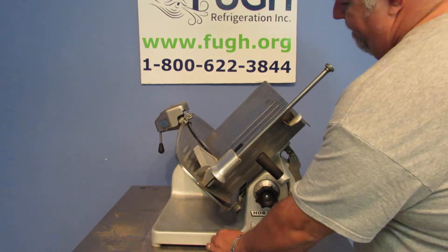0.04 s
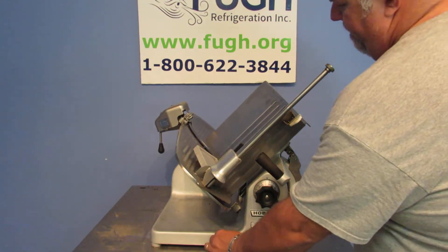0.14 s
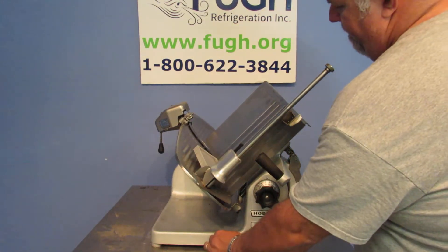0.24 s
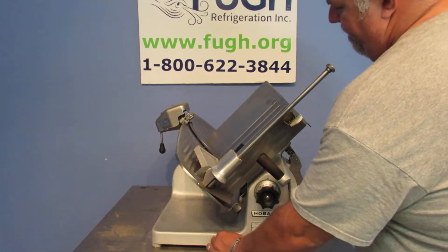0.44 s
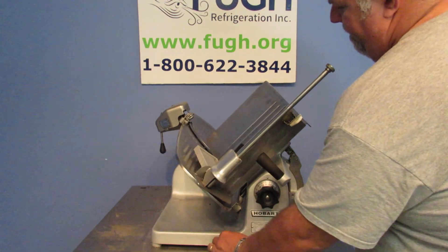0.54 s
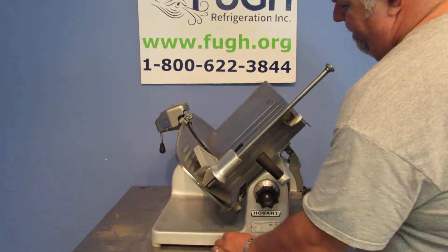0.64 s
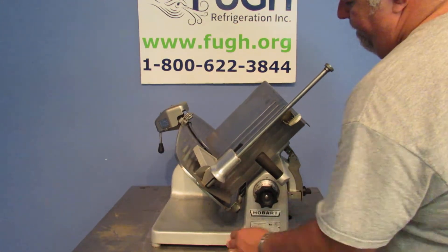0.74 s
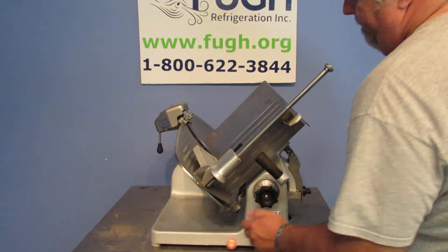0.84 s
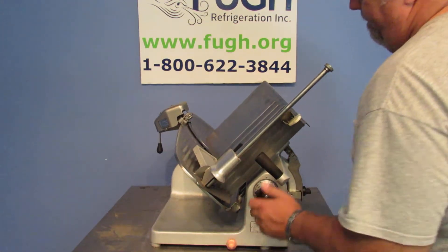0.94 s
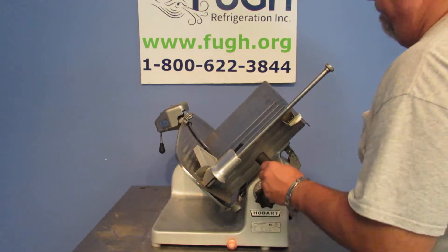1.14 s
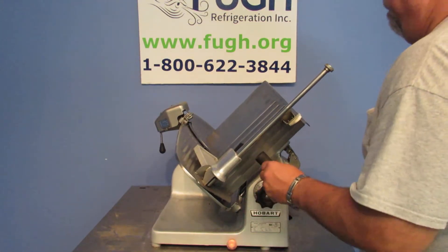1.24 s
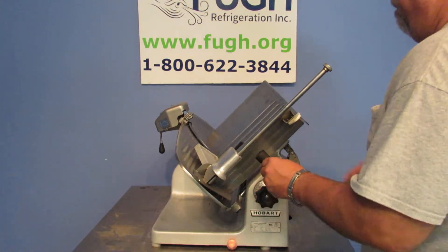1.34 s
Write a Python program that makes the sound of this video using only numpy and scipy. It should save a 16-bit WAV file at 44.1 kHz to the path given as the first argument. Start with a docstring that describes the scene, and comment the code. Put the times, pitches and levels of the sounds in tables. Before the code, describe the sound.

An electric meat slicer starts up close by in a small room. Its switch clacks twice, at about 0.1 and 0.2 seconds, and the motor kicks in with a deep throbbing buzz and metal rattle, loudest around 0.3 seconds. A softer click comes near 0.6 seconds. It then settles into a quieter, steady low hum with whirring gears and faint blade hiss until the end at about 1.4 seconds.

```python
"""A deli slicer on a steel table starts up in a small room, close to a stereo pair of microphones.
Its switch clacks twice; the motor jolts the gears and housing as it runs up, the starting switch
clicks out, and it settles into a mains hum with the whirr of the gears and the hiss of the blade.
Low room tone lies underneath, and the bass sits a little towards the right microphone."""
import sys
import numpy as np
from scipy import signal
from scipy.fft import rfft, irfft
from scipy.io import wavfile

SR = 44100
rng = np.random.default_rng(int(sys.argv[2]) if len(sys.argv) > 2 else 0)


def materialize(psi):
    """Save the field psi as 16-bit PCM at rate SR to the path in sys.argv[1].

    A 1-D psi becomes a single channel; in a 2-D psi each row is a channel.
    """
    bounded = np.clip(np.atleast_2d(psi).T, -1, 1)
    quanta = np.round(bounded * 32767).astype(np.int16)
    wavfile.write(sys.argv[1], SR, quanta)


N = 61739
T, HZ = np.arange(N) / SR, np.fft.rfftfreq(N, 1 / SR)
EARLY_HUM_HZ, MAINS_HUM_HZ, UP_TO_SPEED_S = 126.5, 120, .6


def amp(db):
    """Decibels to gain."""
    return 10 ** (np.asarray(db) / 20)


def unit(x):
    """Scales to rms 1."""
    return x / np.sqrt(np.mean(x ** 2) + 1e-20)


def read(points, hz):
    """Reads a table on a log-frequency axis."""
    f, value = np.transpose(points)
    return np.interp(np.log(hz + 1), np.log(f + 1), value)


def ramp(start_s, rise_s):
    """Rises from 0 to 1 and stays there."""
    return np.clip((T - start_s) / rise_s, 0, 1)


def drift(rate_hz):
    """Random wander of rms 1, mostly slower than rate_hz."""
    return unit(irfft(rfft(rng.standard_normal(N)) / (1 + (HZ / rate_hz) ** 4), N))


def mic_gains(hz):
    """Gains at the left and right microphones; the bass leans right."""
    # f/Hz, left minus right level/dB
    balance = [(30, -2), (120, -3.5), (330, -3), (700, -.4), (1400, .2), (12000, .2)]
    return amp(np.array([[.5], [-.5]]) * read(balance, hz))


def colour(pair, db):
    """Shapes two unrelated noises into one stereo sound of rms 1 with the given spectrum."""
    # likeness of the two channels: f/Hz, correlation
    likeness = [(30, .75), (120, .97), (300, .94), (700, .82), (1400, .84), (2200, .95), (3200, .95),
                (5500, .83), (9500, .52), (13000, .05)]
    a, b = rfft(pair)
    like = read(likeness, HZ)
    mid, side = a * np.sqrt(1 + like), b * np.sqrt(1 - like)
    return unit(irfft(np.array([mid + side, mid - side]) * amp(db) * mic_gains(HZ), N))


def room_tone():
    """The steady, low background noise of the room."""
    # spectrum: f/Hz, level/dB
    spectrum = [(15, -40), (30, -10), (60, -4), (120, -1), (180, -6), (280, 1), (380, -3), (520, -11),
                (700, -20), (1000, -14), (1400, -20.5), (2000, -24), (3200, -31.5), (7400, -32.5),
                (13300, -43.5), (14800, -51)]
    return amp(-41.5) * colour(rng.standard_normal((2, N)), read(spectrum, HZ))


def room_echo(x):
    """Diffuse tail off the walls of a small room, treble dying first."""
    # reverberation: f/Hz, t60/s
    decay = [(200, .35), (1500, .3), (5000, .25), (14000, .17)]
    hz, t, spectra = signal.stft(rng.standard_normal((2, N)), SR, nperseg=256)
    spectra *= amp(-60 * t / read(decay, hz)[:, None])
    tail = signal.istft(spectra, SR, nperseg=256)[1][:, :N]
    tail = colour(tail * ramp(.003, .004), 0) * (T < .5) / np.sqrt(N)
    return signal.fftconvolve(x, tail, axes=1)[:, :N]


def switches():
    """Each contact is a short crash of small metal parts, echoed by the room, with one brief ring."""
    # contacts: t/s, level/dB, tilt/(dB per octave), ring f/Hz, ring level/dB relative to the crash
    clicks = [(.1085, -28, -.3, 1980, -7), (.1165, -25.3, -.05, 1810, -6), (.1895, -30.5, -.8, 3200, -3.5),
              (.1955, -26, -.7, 1740, 1.5), (.567, -38, -.7, 2900, -6), (.576, -33.7, -.4, 4100, -6),
              (.686, -40, -5, 1050, -3)]
    # crash spectrum before the tilt: f/Hz, level/dB
    spectrum = [(100, -30), (600, -15), (1050, 4), (1350, -1), (1800, 2), (2600, -3), (4000, -2.5),
                (6500, -6), (9000, -5.5), (12000, -7.5), (15000, -16)]
    crash_t60_s, ring_t60_s = .06, .085
    crashes, rings = np.zeros((2, N)), np.zeros(N)
    for start, db, tilt_db, ring_hz, ring_db in clicks:
        age = np.maximum(T - start, 0)
        strike = amp(db) * ramp(start, rise_s=.0045)
        crash = colour(rng.standard_normal((2, N)), read(spectrum, HZ) + tilt_db * np.log2(HZ + 1))
        crashes += strike * amp(-60 * age / crash_t60_s) * crash
        ring = np.sin(2 * np.pi * ring_hz * age + .5 * drift(120))
        rings += strike * amp(ring_db - 60 * age / ring_t60_s) * ring
    return crashes + rings + amp(-6) * room_echo(crashes)


def motor_hum(cycles):
    """The motor's deep hum, throbbing and buzzier until it is up to speed."""
    # swell of the hum: t/s, relative level/dB
    swell = [(0.2, -50), (0.272, -22), (0.312, -16), (0.342, -18), (0.372, -31), (0.398, -23), (0.488, -29),
             (0.56, -25), (0.584, -27), (0.616, -39), (0.654, -26), (0.69, -26), (0.73, -36), (0.798, -29),
             (0.826, -33), (0.848, -30), (0.888, -37), (0.948, -32), (1.084, -36), (1.114, -33),
             (1.19, -38), (1.224, -31), (1.25, -34), (1.39, -33)]
    # overtones under starting load: harmonic number, level/dB relative to the hum
    overtones = [(2, -18), (3, -16), (4, -25)]
    throb_hz, throb_depth = 21, .3
    load = 1 - ramp(UP_TO_SPEED_S, .1)
    buzz = sum(amp(db) * (1 + .3 * drift(15)) * np.sin(2 * np.pi * (k * cycles + rng.random()))
               for k, db in overtones)
    throbbing = ramp(.36, .02) * (1 - ramp(.52, .04))
    throb = throb_depth * throbbing * np.cos(2 * np.pi * throb_hz * (T - .405))
    level = amp(np.interp(T, *np.transpose(swell)) - .3) * ramp(.19, .02) * (1 + throb)
    return np.sqrt(2) * level * (np.sin(2 * np.pi * cycles) + load * buzz) * mic_gains(MAINS_HUM_HZ)


def gear_rattle(cycles, spectrum, pulsing):
    """Grainy tooth contacts ring the housing; the share `pulsing` bunches on each cycle of the hum."""
    # housing resonances: f/Hz, width/Hz, boost/dB
    resonances = [(334, 25, 3.5), (377, 20, 3), (445, 20, 5), (910, 25, 6), (1020, 30, 2.5), (1135, 45, 4),
                  (1510, 36, 4.5), (1650, 25, 5), (1970, 50, 3.5), (3250, 50, 4)]
    pulse_cycles, grain_db = .3, 1.3
    bunching = 1 - pulsing + pulsing * unit(np.exp(-(cycles % 1) / pulse_cycles))
    contacts = rng.standard_normal((2, N)) * bunching * amp(grain_db * drift(300))
    housing_db = sum(db / (1 + (2 * (HZ - hz) / width) ** 2) for hz, width, db in resonances)
    return colour(contacts, read(spectrum, HZ) + housing_db)


def starting_jolt(cycles):
    """Torque shakes the table, the housing groans and growls, the gears chatter, rasp, then scrape."""
    # stages: start t/s, rise/s, hold/s, t60/s, level/dB, share pulsing with the hum (0-1)
    shudder = (.205, .08, .03, .85, -37.5, .1)
    groan = (.19, .075, .012, .23, -22, .3)
    growl = (.21, .1, .018, .23, -21, .35)
    chatter = (.209, .01, .08, .24, -24, .15)
    rasp = (.262, .026, .012, .2, -30, .2)
    scrape = (.62, .008, .035, .2, -50, .1)
    # their spectra: f/Hz, level/dB
    shudder_spectrum = [(15, -50), (26, -20), (34, -2), (40, 0), (55, -7), (80, -10), (130, -20),
                        (300, -50)]
    groan_spectrum = [(100, -35), (200, -15), (330, -3), (450, 0), (540, -4), (620, -11), (700, -23),
                      (1200, -45), (4000, -70)]
    growl_spectrum = [(60, -35), (120, -15), (170, -5), (250, -7), (330, 0), (400, -1), (470, -7),
                      (560, -14), (700, -28), (1200, -50), (4000, -70)]
    chatter_spectrum = [(200, -35), (560, -18), (700, -25), (880, -4), (1130, 0), (1350, -12), (1550, -9),
                        (1950, -16), (2400, -24), (5000, -35), (9000, -38.5), (15000, -52)]
    rasp_spectrum = [(300, -30), (900, -10), (1550, 0), (2400, -15), (3400, -8), (4800, -16), (6500, -25),
                     (11000, -30), (15000, -43)]
    scrape_spectrum = [(500, -30), (2000, -8), (3000, 0), (4200, -2), (5500, -11), (11000, -14),
                       (15000, -30)]
    stages = [(shudder, shudder_spectrum), (groan, groan_spectrum), (growl, growl_spectrum),
              (chatter, chatter_spectrum), (rasp, rasp_spectrum), (scrape, scrape_spectrum)]
    out = np.zeros((2, N))
    for (start, rise, hold, t60, db, pulsing), spectrum in stages:
        fade_db = -60 * np.maximum(T - start - rise - hold, 0) / t60
        out += ramp(start, rise) * amp(db + fade_db) * gear_rattle(cycles, spectrum, pulsing)
    return out


def whirr(cycles):
    """The running gears and blade, louder while the blade gathers speed and easing as the load falls."""
    # spectrum: f/Hz, level/dB
    spectrum = [(15, -55), (28, -30), (45, -13), (90, -8), (130, -2), (170, 3), (240, 0), (350, -1),
                (520, -6), (600, -12), (690, -22), (830, -11), (1130, -7), (1380, -18), (1620, -15.5),
                (2000, -18), (2300, -25), (3500, -30), (6500, -36), (10000, -44), (15000, -60)]
    start_s, rise_s, ease_s = .25, .08, .25
    load_db = 8 * np.exp(-np.maximum(T - start_s - rise_s, 0) / ease_s)
    return ramp(start_s, rise_s) * amp(-40.7 + load_db) * gear_rattle(cycles, spectrum, pulsing=.2)


def blade():
    """The spinning blade hisses evenly; at full speed a thin whine comes and goes."""
    # airy hiss: f/Hz, level/dB
    spectrum = [(1000, -20), (2500, -2), (4000, -1), (6500, 0), (10000, -4), (13000, -10), (15000, -20)]
    # swell of the whine: t/s, level/dB
    swell = [(.7, -72), (.78, -55), (.84, -70), (1.05, -64), (1.11, -53), (1.17, -53), (1.22, -66),
             (1.32, -63), (1.35, -53), (1.39, -48)]
    whine_hz, flutter = 2015, .45
    whine_level = amp(np.interp(T, *np.transpose(swell))) * ramp(UP_TO_SPEED_S, .1)
    whine_level *= 1 + flutter * drift(25)
    hiss = amp(-57) * ramp(.28, .2) * colour(rng.standard_normal((2, N)), read(spectrum, HZ))
    return hiss + whine_level * np.sin(2 * np.pi * whine_hz * T + drift(20))


def running_tones():
    """Wavering shaft, gear and mains tones that come in as the speed settles."""
    # tones of the running machine: f/Hz, level/dB
    partials = [(59.3, -53), (131, -47), (143, -45), (184, -51), (238.7, -45.5), (328.6, -49), (446.5, -53),
                (479.6, -42.5), (568, -56), (838, -58), (893, -57), (1022, -55), (1083, -56), (1265, -61),
                (1550, -60), (1787, -63)]
    waver = .22
    out = np.zeros((2, N))
    for hz, db in partials:
        level = amp(db) * mic_gains(hz) * (1 + waver * drift(8))
        out += level * np.sin(2 * np.pi * (hz * T + rng.random()) + waver * drift(8))
    return np.sqrt(2) * out * ramp(.52, .3)


def scene():
    """The deep tone starts slightly higher, then settles to the 120 Hz hum; the rattle pulses with it."""
    hum_hz = EARLY_HUM_HZ + (MAINS_HUM_HZ - EARLY_HUM_HZ) * ramp(UP_TO_SPEED_S, .02)
    cycles = np.cumsum(hum_hz) / SR
    return (room_tone() + switches() + motor_hum(cycles) + starting_jolt(cycles)
            + whirr(cycles) + blade() + running_tones())


def record(dry):
    """The stereo pair: the left microphone leads slightly in phase, and the top treble is cut off."""
    # lead of the left microphone: f/Hz, phase/rad
    lead = [(30, .05), (120, .17), (330, .08), (1120, .22), (2240, 0), (8700, .2), (12600, .4)]
    cutoff_hz = 14800
    phase = np.array([[.5], [-.5]]) * read(lead, np.fft.rfftfreq(2 * N, 1 / SR))
    pair = irfft(rfft(dry, 2 * N) * np.exp(1j * phase))[:, :N]
    lowpass = signal.firwin(511, cutoff_hz, window=("kaiser", 9), fs=SR)
    return signal.oaconvolve(pair, lowpass[None], "same")


dry = scene()
out = record(dry)
materialize(out)
```